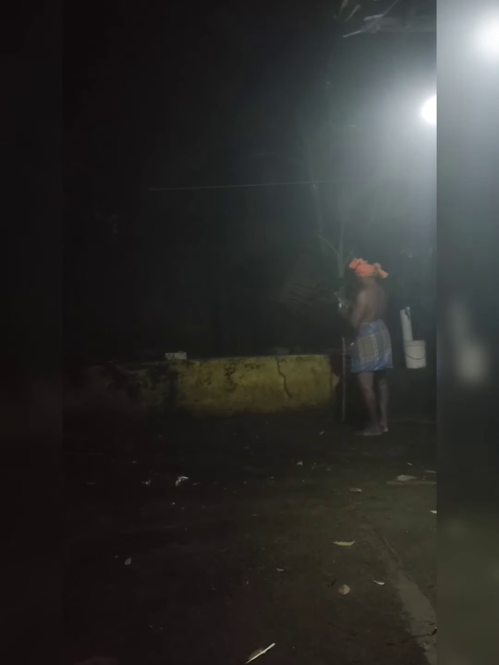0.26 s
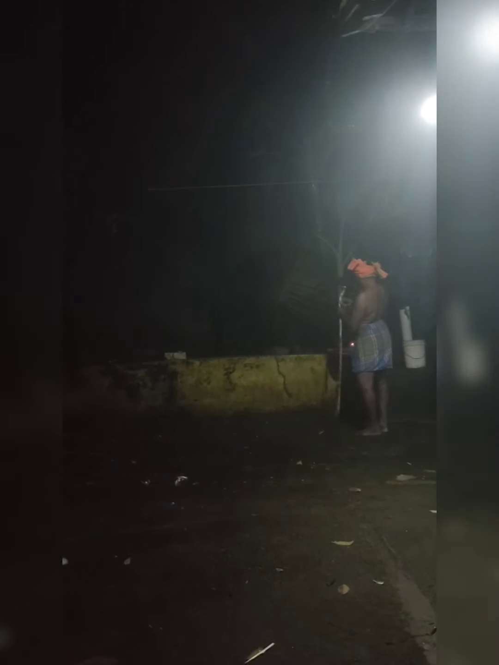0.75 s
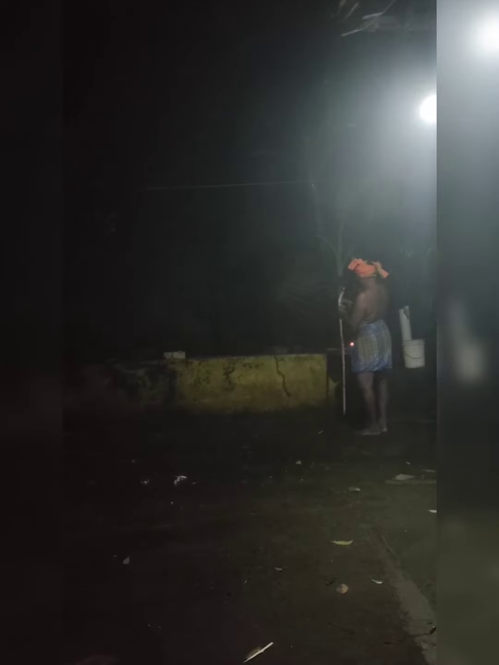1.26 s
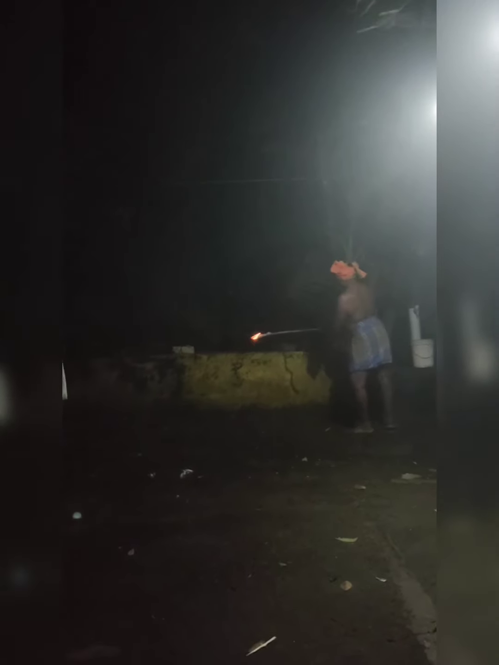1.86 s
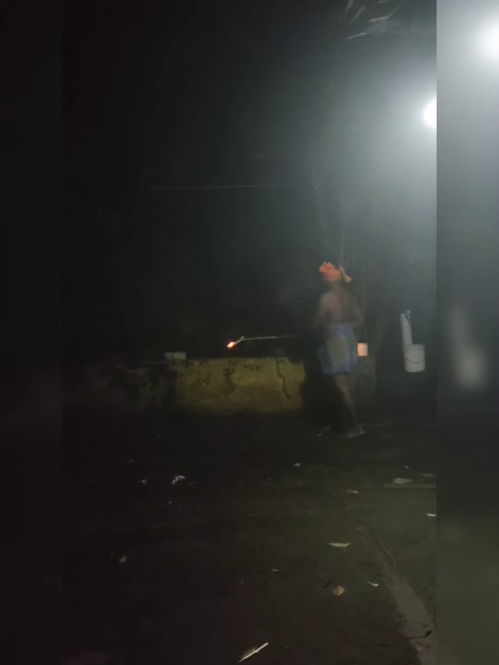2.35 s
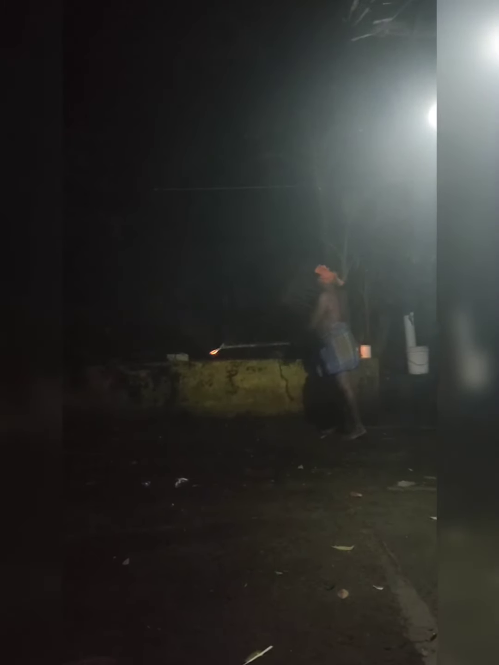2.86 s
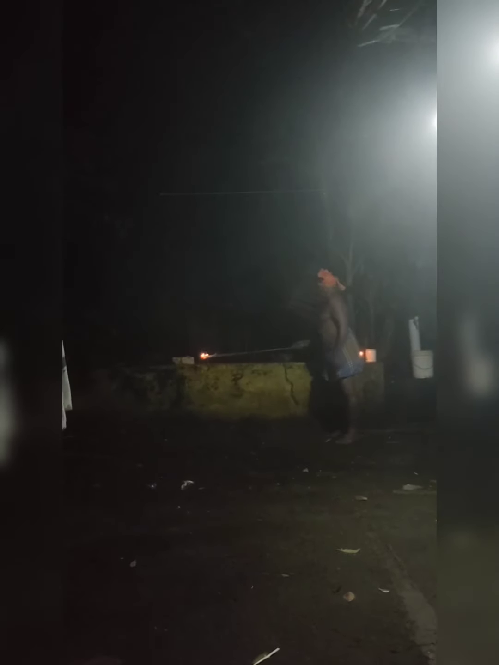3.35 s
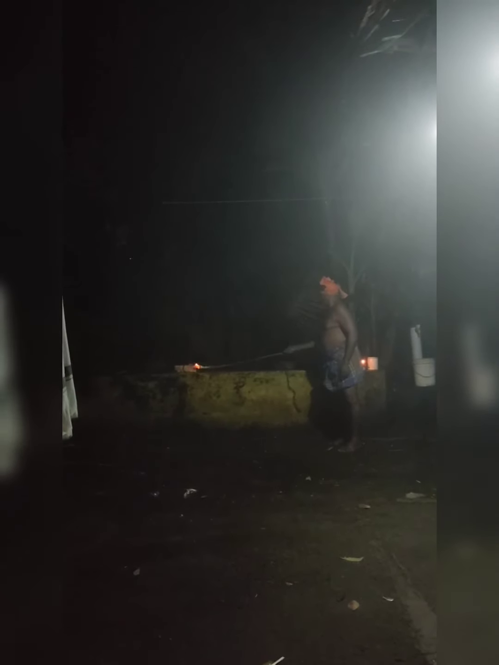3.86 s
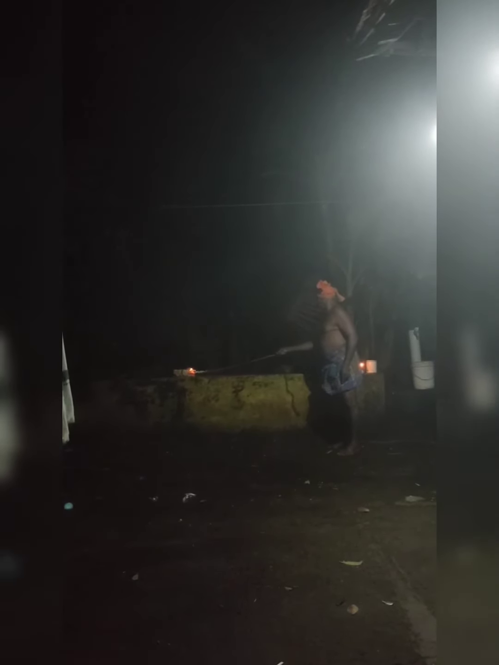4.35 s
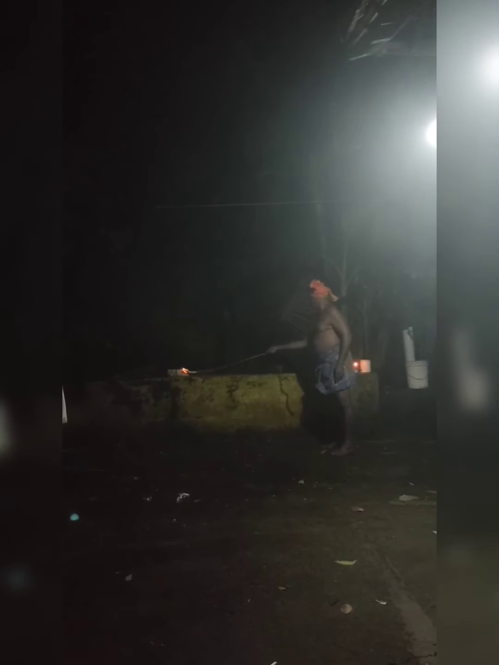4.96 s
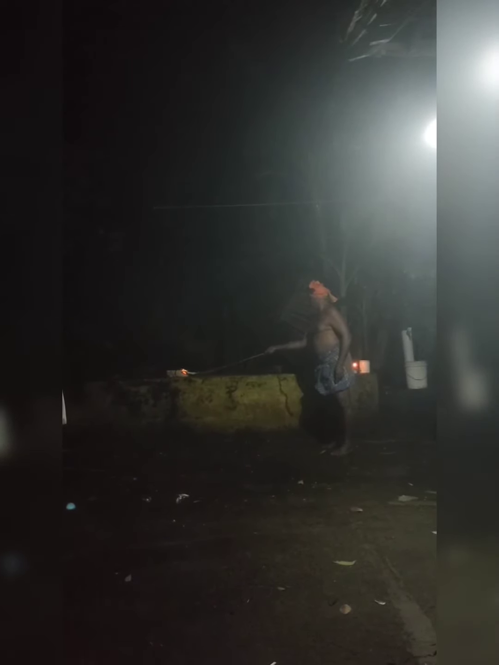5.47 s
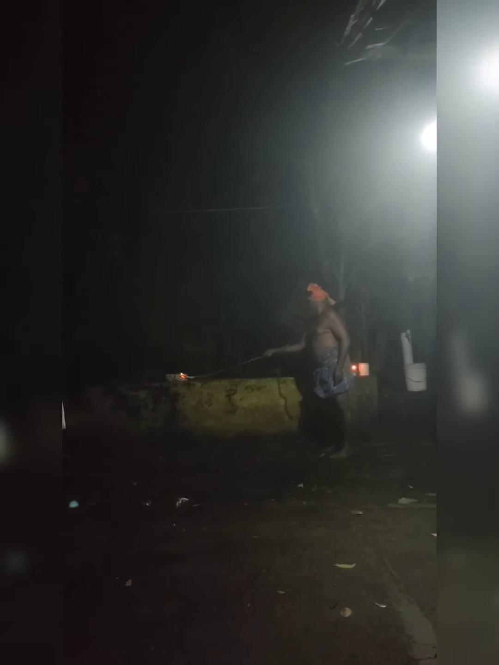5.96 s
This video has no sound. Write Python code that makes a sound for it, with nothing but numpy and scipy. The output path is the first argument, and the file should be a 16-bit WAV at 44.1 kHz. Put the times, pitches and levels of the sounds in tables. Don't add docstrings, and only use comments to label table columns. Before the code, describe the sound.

A hushed outdoor night, with soft low-toned hiss, a thin high insect shimmer swelling and fading, and a steadier mid-pitched chorus pulsing about four times a second. At 0.1 s a brief gritty tick; fainter scuffs follow. A dull distant boom rolls at 1.07 s, with dry leaves crackling and short falling cricket chirps from 1.2 to 1.7 s and one wooden tap at 1.3 s. At 1.74 s the background changes abruptly. Small left-sided stick knocks run from 2.15 to 2.5 s amid faint thuds. At 3.08 s a hugely loud firecracker hits: bassy thump, dense wall slaps and flutter until about 3.35 s, then a broad, darkening roll fading past 5 s. Muffled far thumps come around 4.75 s, a slightly sharper far pop at 5.5 s, faint scuffs between, and soft chirps just after 6 s.

```python
import sys
import numpy as np
from scipy import signal
from scipy.io import wavfile
from scipy.ndimage import uniform_filter1d

SR = 44100
rng = np.random.default_rng(int(sys.argv[2]) if len(sys.argv) > 2 else 0)


def ratio(d):
    e = np.asarray(d, float) / 20
    return 10 ** e


def persist_wave(psi):
    counts = np.round(np.clip(psi, -1, 1) * 32767).astype(np.int16)
    wavfile.write(sys.argv[1], SR, np.atleast_2d(counts).T)


N = 273861
TIME = np.arange(N) / SR
BREAK_S = 1.741


def rms_one(x):
    return x / np.sqrt(np.mean(x ** 2) + 1e-20)


def at_hz(points, hz):
    curve_hz, values = np.array(points)[:, :2].T
    return np.interp(np.log(hz), np.log(curve_hz), values)


def pan(x, db):
    return x * ratio(np.multiply.outer([.5, -.5], np.atleast_1d(db)))


def add(out, s, piece):
    at = min(round(s * SR), N)
    out[:, at:at + piece.shape[-1]] += piece[..., :N - at]


def drift(rate_hz):
    r = np.exp(-80 * np.pi * rate_hz / SR)
    white = rng.standard_normal(N // 40 + 2002)
    slow = signal.lfilter([1], [1, -2 * r, r * r], white)[2000:]
    return np.interp(np.arange(N) / 40, np.arange(len(slow)), rms_one(slow))


def band(x, low_hz, high_hz):
    edges_hz = [low_hz, min(high_hz, .47 * SR)]
    return signal.sosfilt(signal.butter(2, edges_hz, "band", fs=SR, output="sos"), x)


def swells(rows, flat):
    return np.array([ratio(db) * np.sin(np.pi * np.clip((TIME - s) / length_s, 0, 1)) ** flat
                     for s, length_s, db, *_ in rows])


def grit(per_s, spread_db):
    hit = rng.random((2, N)) < per_s / SR
    out = np.zeros((2, N), complex)
    size, turn = rng.random((2, N))[:, :hit.sum()]
    click_db = spread_db * np.minimum(-np.log(size + 1e-9), 4)
    out[hit] = ratio(click_db) * np.exp(2j * np.pi * turn)
    return out + 1e-18


def noise_bands():
    # (frequency [Hz], correlation [1])
    likeness = [(60, 0.86), (150, 0.99), (380, 0.9), (950, 0.38), (2380, -0.45), (5980, 0.35),
                (15000, 0.0052)]
    edges_hz = np.r_[30 * 2 ** np.arange(0, 5, 1 / 3), 960 * 2 ** np.arange(0, 4.6, .5)]
    white = rng.standard_normal((2, 2, N))
    for k, (low_hz, high_hz) in enumerate(zip(edges_hz, edges_hz[1:])):
        mid, side = band(white[k % 2], low_hz, high_hz)
        centre_hz = np.sqrt(low_hz * high_hz)
        alike = np.clip(at_hz(likeness, centre_hz), -1, 1)
        yield centre_hz, np.sqrt(1 + alike) * mid + np.sqrt(1 - alike) * side * [[1], [-1]]


def thumps(rows):
    out = np.zeros((2, N))
    lag_s = .00002
    for s, db, hz, cycles in rows:
        t = TIME[:2000] - np.array([[lag_s], [0]])
        window = np.sin(np.pi * np.clip(t * hz / cycles, 0, 1) ** 0.68) ** 2.1
        add(out, s, ratio(db) * window * np.sin(2 * np.pi * hz * t))
    return out


def echo_field(s, db, lateness, t60_s):
    t = np.maximum(TIME[::21] - s, 1e-5)
    return ratio(db - lateness / t - 60 * t / t60_s)


def every_sample(levels):
    return np.repeat(levels, 21, axis=1)[:, :N]


def roll(bands, levels, colour, anchors_hz, tops_hz, lumpy_db):
    # (frequency [Hz], left minus right [dB])
    sides = [(60, 0.5), (180, 0.5), (550, 1), (1650, 1.5), (4970, -4.5), (15000, -3.5)]
    sounding = np.flatnonzero(levels[0] > 1e-6)
    span = slice(sounding[0], sounding[-1] + 400)
    groups = np.zeros((len(anchors_hz), 2, N))[..., span]
    lumps = drift(29)
    for hz, noise in bands:
        if hz < tops_hz[-1]:
            gain_db = at_hz(colour, hz) + lumpy_db * (lumps + 1.3 * drift(12.3))[span]
            layer = pan(noise[:, span], at_hz(sides, hz)) * ratio(gain_db)
            shares = [np.interp(np.log(hz), np.log(anchors_hz), row) for row in np.eye(len(anchors_hz))]
            for k in np.flatnonzero(shares):
                groups[k] += shares[k] * layer
    levels = uniform_filter1d(levels, 350, axis=1, origin=174)[:, span]
    out = np.zeros((2, N))
    for level, top_hz, group in zip(levels, tops_hz, groups):
        dulled = signal.sosfilt(signal.butter(4, top_hz, fs=SR, output="sos"), group)
        out[:, span] += level * rms_one(dulled)
    return out


def near_bang(bands):
    # (time [s], peak [dB], frequency [Hz], length [cycles])
    hits = [
        (3.078, 1, 172.5, 2.14),
        (3.125, -9, 147, 2),
        (3.141, -10.5, 254.6, 2),
        (3.157, -6, 262, 2.1),
        (3.174, -8.5, 170, 3),
        (3.197, -7.5, 267, 1.8),
        (3.257, -19, 180, 3.4),
        (3.328, -11, 151.5, 2.2),
        (3.348, -13, 240, 2.2),
    ]
    # (time [s], peak [dB], frequency [Hz], length [cycles])
    flutters = [
        (3.099, -6.5, 239, 7.8),
        (3.216, -5, 248, 8.6),
    ]
    # (centre [Hz], top [Hz], level [dB], lateness [dB s], t60 [s])
    groups = [(220, 630, -14.5, 0.04, 2.27), (477, 1240, -20, .015, 2.02), (1000, 1950, -23.5, 0.09, 2.09),
              (2190, 4700, -24.5, 0.51, 1.45), (5000, 9100, -33, 0.87, 1.315)]
    # (frequency [Hz], density [dB per Hz])
    colour = [(18, -67), (45, -43), (134, -10.5), (190, -11), (250, -4), (305, -17), (376, -5), (405, -9.5),
              (480, -11.5), (640, -16), (1110, -13.5), (7830, -51), (9500, -69), (12400, -99),
              (20900, -120)]
    bang_s, yard_s, yard_db = 3.079, .165, 4
    hz, top_hz, *rule = np.transpose(groups)
    levels = every_sample([echo_field(bang_s, *row) for row in zip(*rule)])
    levels[0] *= ratio(yard_db * (TIME < bang_s + yard_s))
    audible = levels[0] > ratio(-74)
    return thumps(hits + flutters) + roll(bands, levels * audible, colour, hz, top_hz, lumpy_db=0.47)


def far_bangs(bands):
    # (time [s], peak [dB], frequency [Hz], length [cycles])
    hits = [(1.071, -46, 188, 2.8), (1.941, -44, 177, 2.4), (1.954, -37.5, 375, 2.6),
            (2.087, -47, 122, 5.5), (2.685, -50, 156, 2.5), (4.745, -32, 168, 3.1), (4.785, -33, 174, 3.8),
            (4.825, -40, 159, 3.6), (4.865, -42, 129, 2), (5.47, -37, 307, 2.7), (5.5, -31.5, 420, 2.3),
            (5.506, -34, 285, 2.1), (6.109, -47, 133, 5)]
    # (time [s], level [dB], brightness [dB per group], t60 [s], detour
    bangs = [(-.1, -60, -4.5, 3.6, 0.91), (1.065, -50.5, 3.5, 2.4, 1.7), (1.57, -51, -13.5, 2, 1.1),
             (1.935, -51.5, -0.5, 1.28, 0.18), (2.07, -63, -7, 1.5, 1.1), (2.39, -66.5, 3, 1.25, 0.55),
             (2.679, -54, -9.5, 1.17, 0.97), (4.15, -43, -4.5, 1.04, 1.4), (4.74, -47.5, -7, 1.3, 0.93),
             (4.99, -55.5, -4.5, 2.9, .3), (5.465, -50.5, 5.5, 1.73, 0.64), (6.09, -60.5, -1.5, 2.2, 1.2)]
    # (centre [Hz], top [Hz], level [dB], lateness [dB s], share of t60 [1])
    groups = [(170, 490, -0.35, 0.3, 1.04), (438, 870, 0, 0.29, 1.02), (1000, 2400, -8, 0.5, 1.21)]
    # (frequency [Hz], density [dB per Hz])
    colour = [(18, -65), (30, -60), (107, -5.5), (177, -2.5), (247, -2), (373, -0.5), (410, -0.5),
              (832, -10.5), (1690, -27.5), (2600, -27), (3380, -56), (5720, -120)]
    before = TIME[::21] < BREAK_S
    levels = []
    for k, (*_, group_db, lateness, share) in enumerate(groups):
        levels.append(sum(
            echo_field(s, db + group_db + k * bright_db, lateness * detour, t60_s * share)
            * (before | (s > BREAK_S))
            for s, db, bright_db, t60_s, detour in bangs))
    hz, top_hz, *_ = np.transpose(groups)
    return thumps(hits) + roll(bands, every_sample(levels) + 2e-6, colour, hz, top_hz, lumpy_db=0.97)


def scuffs():
    # (time [s], peak [dB], centre [Hz], t60 [s], left minus right [dB])
    bursts = [(.102, -36.5, 5930, 0.0071, 10), (0.1, -47.5, 4900, 0.28, -0.5), (.354, -57, 860, 0.27, -1),
              (.399, -58.5, 1000, 0.73, 0), (.84, -53.5, 518, 0.12, 1), (2.96, -64.5, 1300, .3, -11),
              (3.029, -57.5, 1300, 0.16, -1.5), (3.339, -24, 1150, 0.075, 1), (3.097, -25, 1000, 0.041, -5),
              (4.135, -58.5, 4000, 0.11, -5.5), (4.858, -53.5, 1460, 0.058, -1.5),
              (5.032, -55, 1860, 0.2, -0.2), (5.279, -58, 1440, 0.24, 4.5)]
    octaves_per_khz, widest_octaves = 0.78, 1.95
    grains = grit(9000, 2.1).real
    out, t = np.zeros((2, N)), TIME[:SR // 2]
    for s, db, hz, t60_s, side_db in bursts:
        half = min(octaves_per_khz * hz / 1000, widest_octaves) / 2
        own = band(grains[:, round(s * SR):][:, :len(t)], hz * 2 ** -half, hz * 2 ** half)
        envelope = ratio(db - 60 * t / t60_s) * (1 - np.exp(-t / 0.00051))
        add(out, s, pan(envelope * rms_one(own), side_db))
    return out


def taps():
    # (time [s], peak [dB], left minus right [dB])
    knocks = [
        (1.289, -46, -16),
        (2.157, -45, -23),
        (2.264, -42, -25),
        (2.33, -45, -17),
        (2.397, -45.5, -18),
        (2.46, -50, -2.0),
        (2.516, -52.5, -15),
    ]
    # (frequency [Hz], level [dB], t60 [s])
    modes = [(415, 2, 0.01), (1150, -0.5, 0.012), (1630, -9, 0.0094), (2450, -8, 0.005), (3580, -12, .004)]
    out, t = np.zeros((2, N)), TIME[:2000]
    spreads_db = rng.normal(0, 0.96, (len(knocks), len(modes)))
    for (s, db, side_db), spread_db in zip(knocks, spreads_db):
        rings = sum(ratio(mode_db + e - 60 * t / t60_s) * np.sin(2 * np.pi * hz * t)
                    for (hz, mode_db, t60_s), e in zip(modes, spread_db))
        attack = 1 - np.exp(-t / 0.0012)
        add(out, s - .001, pan(ratio(db + 5.5) * rings * attack, side_db))
    return out


def leaves():
    # (time [s], length [s], peak [dB])
    steps = [
        (1.14, 0.43, -64),
        (1.5, .13, -61.5),
        (1.615, 0.14, -64),
    ]
    # (frequency [Hz], density [dB per Hz])
    colour = [(1500, -12), (3000, 5), (6000, 1.5), (10000, 0.5), (14000, -7.5), (16000, -5)]
    grains = grit(7000 * ratio(np.clip(5 * drift(12), -12, 8)), 4.6).real
    centres_hz = 1500 * 2 ** np.arange(0, 3.6, .5)
    crackle = sum(ratio(at_hz(colour, hz)) * band(grains, hz / 2 ** 0.18, hz * 2 ** 0.15)
                  for hz in centres_hz)
    return pan(ratio(5.5) * swells(steps, flat=0.5).sum(axis=0) * rms_one(crackle), 1.95)


def cricket():
    # (time [s], length [s], last stroke [dB], start frequency [Hz])
    chirps = [
        (1.182, .1, -45, 5170),
        (1.442, .067, -47.5, 5160),
        (1.694, .067, -47, 5130),
        (6.064, .1, -52.5, 5020),
        (6.168, .067, -50, 5020),
    ]
    stroke_s, stroke_gain_db = .0338, 4.5
    fall_hz, length_s = 1050, 0.024
    echoes = [(0, 2), (.004, -18), (.009, -10), (.013, -11), (.018, -7), (.023, -5)]   # (lag [s], level [dB])
    strokes = []
    for s, chirp_s, db, hz in chirps:
        count = round(chirp_s / stroke_s)
        for k in range(count):
            strokes.append((s + k * stroke_s, db - stroke_gain_db * (count - 1 - k), hz))
    out, u = np.zeros((2, N)), np.clip(TIME[:1500] / length_s, 0, 1)
    for (s, db, hz), spread in zip(strokes, rng.normal(0, 1, (len(strokes), 6))):
        chirp = np.sin(np.pi * u) * np.sin(2 * np.pi * length_s * (hz * u - fall_hz * u ** 2 / 2))
        for k, (lag_s, echo_db) in enumerate(echoes):
            side_db = -8 if k == 0 else 9 * spread[k] - 4
            add(out, s + lag_s, pan(ratio(db + 2 + echo_db + 0.91 * spread[k]) * chirp, side_db))
    present = (TIME < BREAK_S) | (TIME > 2 * BREAK_S)
    return out * ratio(1.8 * drift(153)) * present


def chorus(hz, width_hz, per_s, throb_hz, depth):
    r = np.exp(-np.pi * width_hz / SR)
    rings = signal.lfilter([1], [1, -2 * r, r * r], grit(per_s, 1.2))
    carrier = np.exp(2j * np.pi * np.cumsum(hz * np.ones(N)) / SR)
    throb = 1 + depth * np.sin(2 * np.pi * throb_hz * TIME + 2.8 * drift(3.3))
    return rms_one(np.real(rings * carrier) * throb)


def high_singers():
    # (time [s], length [s], peak [dB], frequency [Hz], left minus right [dB])
    rows = [(-.15, 0.56, -57, 7780, -3.5), (0.346, 0.33, -66, 7630, -4), (0.621, .38, -59, 7910, -1),
            (.85, 0.34, -57.5, 7800, -4), (1.104, 0.53, -65.5, 7530, -4), (1.549, 0.27, -63.5, 7750, -4),
            (1.699, 0.31, -58, 7980, 2), (1.977, 0.46, -62.5, 7860, -4), (2.52, 0.45, -66, 7450, -4),
            (2.856, 0.43, -58, 7930, 0.1), (3.76, .32, -72, 7480, -7), (4.36, 0.49, -68, 8300, 0),
            (5.325, 0.34, -69, 7460, -1), (5.516, 0.52, -58, 7930, -3), (6.05, .3, -67, 7560, -2)]
    arcs = swells(rows, flat=1.1) + 1e-9
    total = arcs.sum(axis=0)
    hz, side_db = np.array(rows)[:, 3:].T @ arcs / total
    return pan(total * chorus(hz, 300, 790, 25, 0.13), side_db)


def mid_singers():
    bursts_db = 2.0 * np.cos(2 * np.pi * 3.97 * (TIME - 5.41))
    pause_s, pause_length_s, pause_db = 0.16, 0.44, -7.5
    falter_db = pause_db * swells([(pause_s, pause_length_s, 0)], flat=1.0)[0]
    return pan(ratio(-64.5 + falter_db + bursts_db) * chorus(3050, 310, 900, 44, 0.1), -2)


def far_crickets():
    # (time [s], length [s], peak [dB])
    rows = [
        (1.9, 0.46, -74),
        (2.3, 0.99, -66.5),
        (4.38, .35, -73),
        (4.6, 1.24, -70.5),
        (5.98, .5, -68.5),
    ]
    voices = chorus(4300, 600, 1200, 31, 0.292) + ratio(-3.0) * chorus(4900, 460, 1200, 29, .3)
    return pan(swells(rows, flat=0.52).sum(axis=0) * voices, -2.5)


def insects():
    thin = ratio(-74.5) * chorus(6400, 390, 970, 40, .3)
    return high_singers() + mid_singers() + far_crickets() + thin + cricket()


def night(bands):
    # (frequency [Hz], density [dB per Hz])
    colour = [(18, -54), (30, -39), (115, 1), (204, 0), (666, -10), (1960, -13), (2540, -13.5), (2980, -9),
              (3400, -15.5), (5590, -16.5), (7670, -17.5), (10500, -20), (14400, -21), (16000, -23.5)]
    hiss = rms_one(sum(ratio(at_hz(colour, hz)) * noise for hz, noise in bands))
    return ratio(-59 + 0.4 * drift(5.6)) * hiss


def scene():
    bands = list(noise_bands())
    swapped = [(hz, noise[:, ::-1]) for hz, noise in bands]
    blasts = near_bang(bands) + far_bangs(bands)
    return blasts + scuffs() + taps() + leaves() + insects() + night(swapped)


def roll_off(x):
    return signal.sosfilt(signal.butter(12, 15530, fs=SR, output="sos"), x)


def record(dry):
    top, bass_hz = 1.3, 40
    left = np.r_[np.zeros(5), dry[0, :-5]]
    rounded = top * np.tanh(np.array([left, dry[1]]) / top)
    mix = signal.sosfilt(signal.butter(1, bass_hz, "high", fs=SR, output="sos"), rounded)
    return roll_off(mix)


dry = scene()
out = record(dry)
persist_wave(out)
```